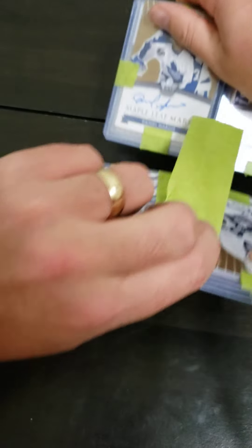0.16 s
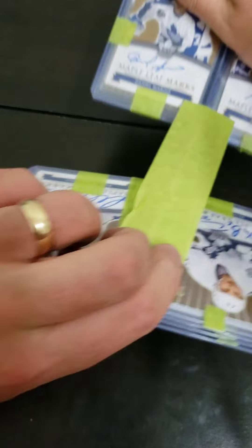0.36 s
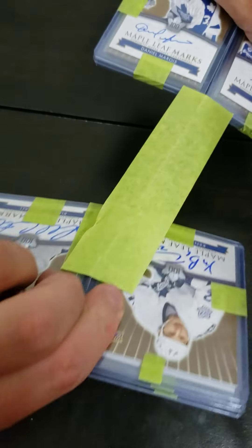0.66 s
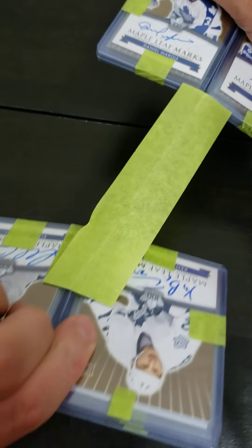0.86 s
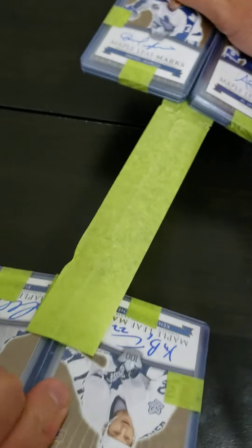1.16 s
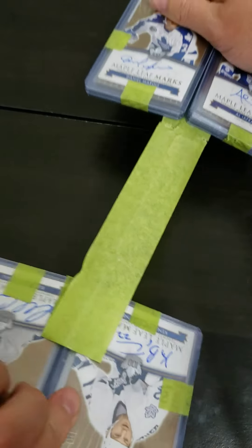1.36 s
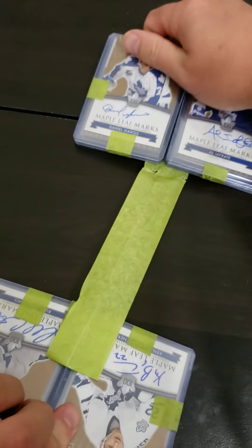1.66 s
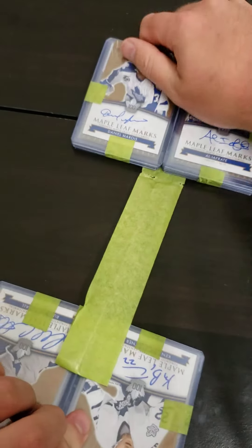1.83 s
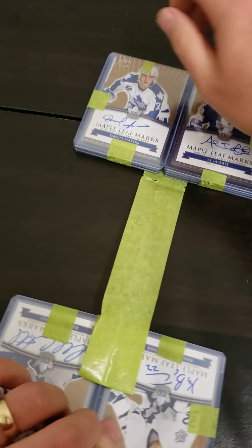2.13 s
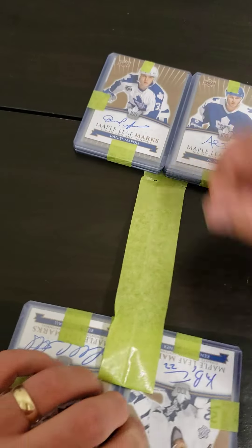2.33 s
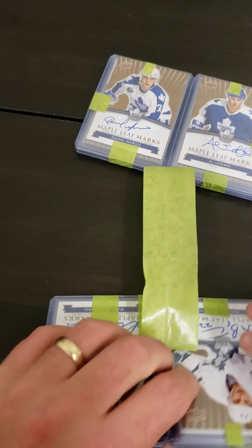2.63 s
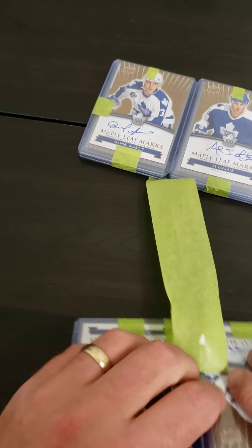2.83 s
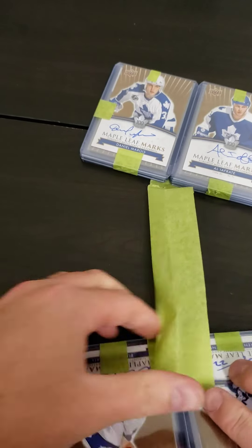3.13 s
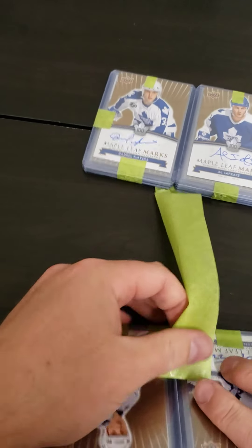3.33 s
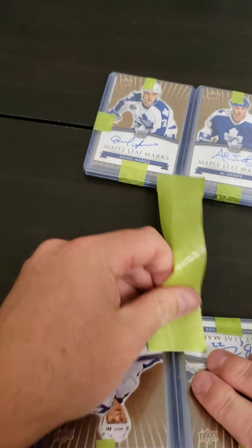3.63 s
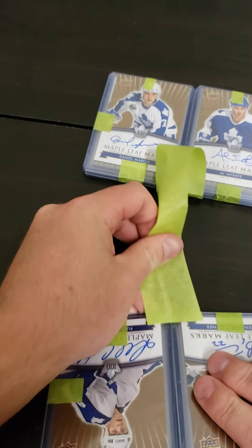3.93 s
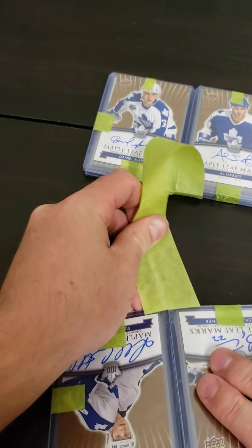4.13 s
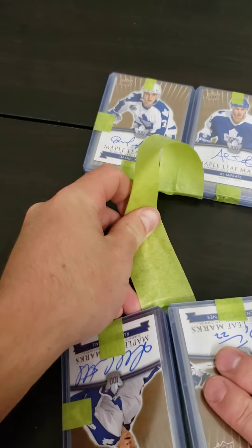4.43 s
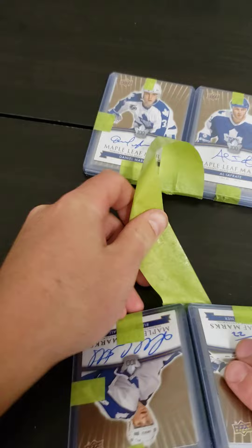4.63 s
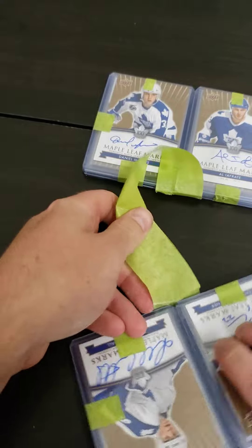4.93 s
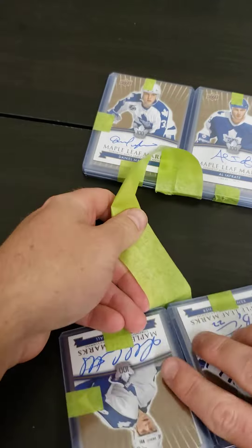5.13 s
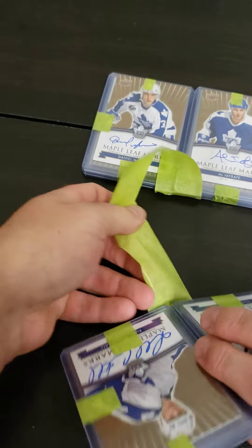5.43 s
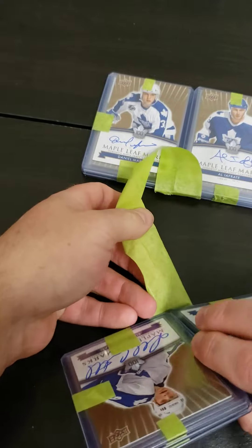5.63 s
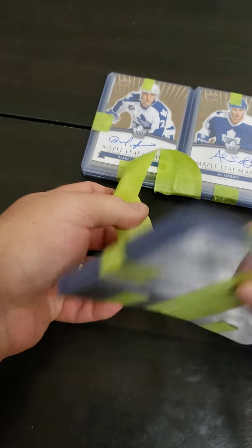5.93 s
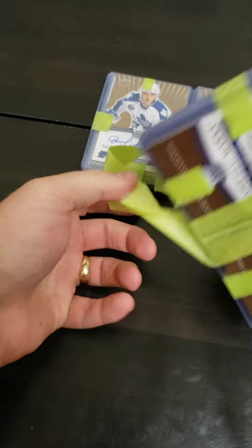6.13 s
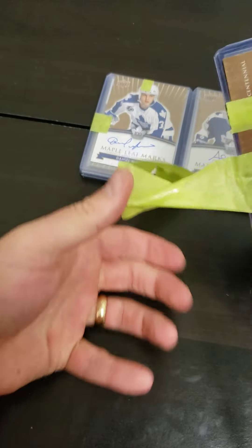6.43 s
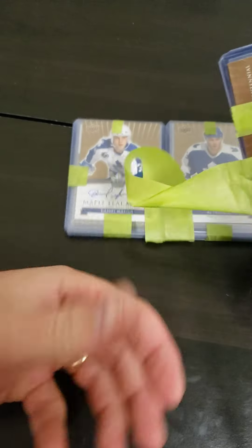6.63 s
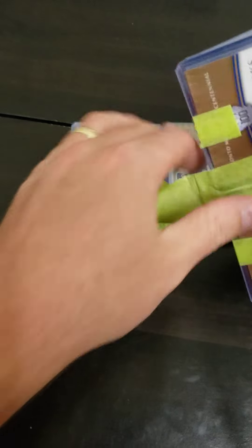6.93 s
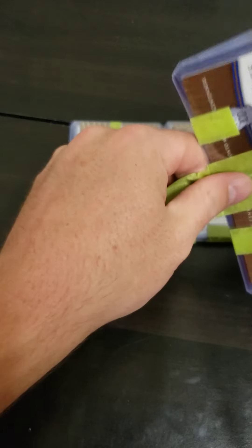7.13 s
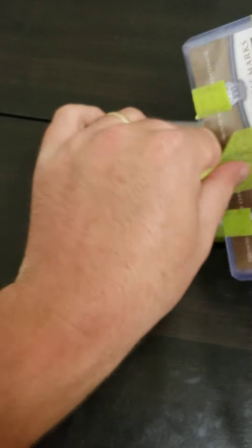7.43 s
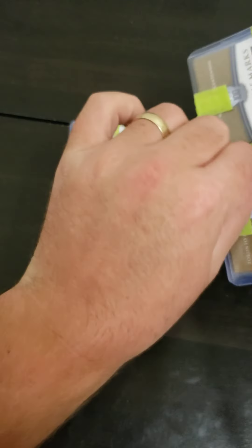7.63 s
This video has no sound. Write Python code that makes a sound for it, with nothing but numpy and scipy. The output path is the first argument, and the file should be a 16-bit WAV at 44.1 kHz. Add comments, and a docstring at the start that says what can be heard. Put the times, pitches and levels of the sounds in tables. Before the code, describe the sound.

Close stereo pickup at a table in a small, lightly echoing room, with a faint low motor hum and air noise. At 0 s masking tape rips off hard plastic in a dense, gritty crackle, strongest around 0.1-0.4 s and leaning left, with low sliding beneath. A sharp snap and knock land at 1.0 s. Quiet shuffling follows; a weak creak rises from 1.75 s into clustered stack knocks at 2.05 s. Soft slides and finger brushing lead to a second, hollow crackling peel at 3.5-4.1 s, ending in the hardest, brightest crack at 4.23 s. From 4.65 to 5.4 s the stack scrapes and judders dully, with a click at 5.26 s. After light ticks, slack tape crinkles and snaps at 6.2-6.6 s, with a knock and soft bumps. A short pull at 7.3-7.7 s brings more knocks and cracks, the last at 7.73 s.

```python
"""A table in a small room, with a phone close by: masking tape is pulled off stacks of hard plastic card holders.
Glue lets go in showers of tiny snaps through the resonant strip; cracks are bursts of fractures with a short ring.
Stacks slide (low friction noise), judder (slip pulses), knock (damped modes) and creak (a rising tone).
Fingers brush the plastic, the phone is bumped, and a low hum and faint air noise run throughout."""
import sys
import numpy as np
from scipy import signal
from scipy.fft import rfft, irfft
from scipy.io import wavfile
from scipy.ndimage import uniform_filter1d

SR = 44100
rng = np.random.default_rng(int(sys.argv[2]) if len(sys.argv) > 2 else 0)


def to_wav(s):
    """Save 16-bit WAV."""
    ch = np.atleast_2d(s).T  # columns
    pcm = np.round(np.clip(ch, -1, 1) * 32767)  # PCM
    wavfile.write(sys.argv[1], SR, pcm.astype(np.int16))


N = 342657
T = np.arange(N) / SR

# Steady pulls on the tape. Each row: start in seconds, length in seconds, level in dB,
# treble against it in dB, shape of the strip.
PULLS = [(0.0, 0.57, -38.5, -1, "flat"), (.66, 0.16, -54.5, -2, "flat"), (0.756, 0.16, -42.5, -5.5, "flat"),
         (3.442, .1, -56, 2, "folded"), (3.554, 0.58, -44.5, -3.5, "folded"),
         (6.147, 0.034, -49, 2, "slack"), (6.295, 0.24, -47, -1.5, "slack"),
         (7.259, 0.44, -42.5, -1.5, "short")]
PULL_ATTACK_S, PULL_SAG_DB_PER_S, PULL_RELEASE_S = 0.036, 5, 0.077
# Rips, where a stretch of glue gives way and the peel races. Each row: centre in seconds,
# half width in seconds, level in dB, treble against it in dB, shape of the strip.
RIPS = [(.165, 0.037, -25.5, -6, "flat"), (.295, 0.021, -34, -3.5, "flat"), (.988, 0.0083, -30, -5, "flat"),
        (3.659, 0.049, -34, 1, "folded"), (3.75, .06, -34, -2, "folded"),
        (3.865, 0.037, -39.5, 0.5, "folded"), (6.48, 0.018, -45, 7, "slack"),
        (7.46, 0.033, -40.5, 1.5, "short"), (7.635, 0.018, -36, -10, "short")]
# Creases buckling in the moving strip; level against a glue thread.
CRINKLES_PER_S, CRINKLE_DB = 50, 16
# Spectrum of the tape's snaps. Each row: frequency in Hz, gain in dB.
TAPE_COLOUR = [(150, -15.5), (500, -5), (1000, 1), (2000, -3.5), (3500, 3), (6000, -2), (7000, -7),
               (8500, -11), (10500, -10.5), (13000, -8.5), (15500, -10.5)]
# Strip resonances, which vary with free length and tension.
# Each row: frequency in Hz, width in Hz, lift in dB.
FLAT_STRIP = [(950, 290, 4.5), (3823, 210, 1.5), (4787, 1000, 7), (5600, 1200, 2.5)]
FOLDED_STRIP = [(1114, 400, 9.7), (2684, 440, 8.9), (4130, 190, 3), (4710, 680, 7.9)]
SLACK_STRIP = [(915, 340, 7.9), (1740, 290, 4.5), (3560, 300, 3.3), (4800, 1400, 4.2)]
SHORT_STRIP = [(1860, 360, 9.2), (4370, 300, 4.9), (5300, 320, 9.4)]

# Stacks shoved over the table. Each row: start in seconds, length in seconds, level before trim in dB.
SLIDES = [(0.0, 0.68, -50.5), (.1, 0.16, -50), (.49, 0.067, -50), (0.784, 0.15, -47.5),
          (1.154, 0.13, -61.5), (1.538, 0.7, -58), (1.653, 0.055, -47), (2.25, 0.61, -52.5),
          (2.683, .12, -53.5), (3.142, 0.41, -61.5), (3.619, 0.26, -51.5), (4.12, 0.26, -64),
          (4.664, 0.34, -52.5), (4.962, 0.18, -45), (5.15, 0.24, -55.5), (6.332, 0.363, -50),
          (7.317, 0.51, -54)]
SLIDE_ATTACK_S, SLIDE_SAG_DB_PER_S, SLIDE_RELEASE_S = 0.033, 10.5, 0.016
# Spectrum of sliding friction. Each row: frequency in Hz, gain in dB.
SLIDE_COLOUR = [(40, -36), (80, -11), (130, 5), (300, -5.5), (550, -7), (750, -17.5), (1300, -19),
                (4000, -65)]
# Table under friction. Each row: frequency in Hz, width in Hz, lift in dB.
TABLE_RESONANCES = [(134, 30, 6), (211, 15, 7.5), (334, 40, 9.5), (577, 7.3, 6.5)]

# Motor hum. Each row: mean frequency in Hz, mean level before panning in dB.
HUM = [(59.3, -49), (119, -68.5), (205, -82.5), (318, -81)]
# Spectrum of the air noise. Each row: frequency in Hz, gain in dB.
AIR_COLOUR = [(20, -31), (35, 1), (70, 7.5), (120, -4.5), (200, -8.5), (320, -10), (480, -23.5),
              (800, -28.5), (2000, -31), (4500, -30), (8500, -43), (12000, -37), (16000, -36)]
AIR_DB = -60

# Cracks of the tape and clicks of the holders. Each row: time in seconds, body, bite and treble levels
# before trim in dB, left minus right of bite and treble in dB, mean fracture delay in seconds.
SNAPS = [(0.061, -47, -30, -50, 11, 0.002), (0.117, -31, -28, -44, 16, 0.0015),
         (.277, -50, -21.5, -34.5, 1, 0.0013), (0.391, -29, -23.5, -28, 2, .0012),
         (0.485, -51, -37, -43, -3, 0.0029), (.962, -42, -27.5, -35, 7, .0014),
         (0.981, -44.5, -28, -31, 2.5, .002), (.987, -28.5, -24, -16.5, 7.5, 0.0017),
         (0.999, -28, -34, -44, -3, 0.0037), (1.38, -59.5, -70, -71, -4, 0.0033),
         (1.548, -69.5, -56.5, -69.5, 0, 0.0012), (1.924, -51, -39.5, -52, 3, 0.002),
         (2.037, -46, -35.5, -56, -1, 0.0034), (2.051, -21.5, -25, -33.5, 3.5, 0.0018),
         (2.893, -62.5, -61.5, -70, -5, 0.0018), (2.965, -61, -63.5, -83.5, -2.5, .0021),
         (3.353, -48, -54, -74.5, 1, 0.0012), (3.554, -45.5, -35, -35, -2, 0.0099),
         (3.626, -28, -28.5, -31, -3, 0.0022), (3.679, -25, -30, -28, 8, 0.005),
         (3.713, -29, -34, -18.5, 4, .0019), (3.76, -27.5, -33, -23, 1, 0.0017),
         (3.797, -39.5, -39.5, -38, 11, 0.0014), (3.857, -34, -30.5, -34.5, -1, 0.0016),
         (3.967, -45.5, -39, -41, -1, 0.0047), (4.07, -41, -40, -37, 1, 0.0014),
         (4.137, -42, -49, -47, -3, 0.0011), (4.22, -40, -43, -43, -1, 0.0046),
         (4.2307, -15, -17.5, -18.5, 3, 0.0017), (4.237, -25, -18.5, -33, 7, 0.002),
         (4.331, -31.5, -31.5, -36, 4, 0.0021), (4.579, -63, -58, -51, -2, 0.0024),
         (4.632, -57, -66, -73, -3, 0.0036), (4.815, -45.5, -43.5, -41.5, 2, 0.0018),
         (4.74, -48, -62, -56, -8, 0.0025), (4.98, -39, -46, -72, 0, 0.0038),
         (5.028, -43.5, -47.5, -67, 4, 0.0025), (5.045, -33.5, -45, -77, 3, 0.0025),
         (5.095, -41, -49, -68.5, 4, .0022), (5.259, -27.5, -33, -41, -6, 0.0013),
         (5.547, -67, -60.5, -61.5, 0, 0.0035), (5.686, -64, -63.5, -68.5, -1.5, 0.0043),
         (5.729, -62, -46, -56, 3, .0013), (5.795, -55, -35.5, -47, 4, 0.0016),
         (5.819, -56, -43.5, -51, 8, 0.002), (5.878, -36, -49, -52, 26, .001),
         (6.178, -65, -37.5, -43.5, -0.5, 0.0017), (6.287, -44, -49.5, -45.5, -5, 0.0048),
         (6.309, -36.5, -31.5, -30.5, 3.5, 0.0012), (6.342, -27, -24.5, -19.5, 6, 0.0014),
         (6.376, -39, -44, -49, 5, .0015), (6.423, -40, -44, -45, 2, 0.0012),
         (6.497, -40, -53, -38, -2, .002), (6.591, -35, -28.5, -38, 5, .0016),
         (6.92, -68.5, -58.5, -70, 0, 0.0029), (7.1, -48.5, -60, -55, 1, 0.0033),
         (7.288, -38, -39, -45, -8, 0.0021), (7.306, -26.5, -37.5, -46, -3, 0.0066),
         (7.311, -28, -35.5, -34, 8, 0.00093), (7.546, -40, -35.5, -52, 6, 0.0036),
         (7.605, -25.5, -31.5, -37, 0, 0.0049), (7.609, -25, -25, -32, 1, 0.0038),
         (7.7301, -23, -22, -31, 8, .0018)]
# Spectrum of a crack. Each row: frequency in Hz, gain in dB.
CLICK_COLOUR = [(200, -23), (650, -12.5), (850, -2.5), (1100, 3.5), (1500, -1), (1900, -0.5), (2450, 0),
                (2900, 1), (3250, 0), (3700, -1), (4400, 5.5), (6000, 0.5), (8000, -7), (11000, -7.5),
                (15500, -8.5)]

# Stacks knocking on the table. Each row: time in seconds, loudest 5 ms level before trim in dB,
# plastic ring against the table's thud in dB.
KNOCKS = [(.998, -26.5, -17.5), (1.004, -31.5, -19), (1.544, -62, 4.5), (1.669, -50.5, 24.5),
          (1.921, -43, -2.5), (2.042, -31, -24), (2.052, -20, 3), (2.073, -28, -4), (2.081, -25, -4.5),
          (2.713, -47.5, -5.5), (3.142, -58.5, -8.5), (4.231, -47, 4), (4.371, -45, -30),
          (6.343, -40.5, -31), (6.591, -32.5, -10.5), (7.313, -29.5, -24), (7.612, -31.5, -10)]
# Modes of a stack and of the table top. Each row: mean frequency in Hz, level in dB, t60 in seconds.
STACK_MODES = [(460, -15, 0.049), (537.2, 4.5, 0.11), (524, -9, 0.04), (867, -9.5, 0.031),
               (1150, -16.5, 0.03), (1315, -8, 0.051), (1526, -30, 0.034)]
TABLE_MODES = [(90, 3.5, 0.048), (128.2, 2.5, 0.14), (220, 4, 0.049), (275, -1.5, 0.048), (330, -7, 0.052)]
# Spectrum of the holders' rattle. Each row: frequency in Hz, gain in dB.
RATTLE_COLOUR = [(70, -6), (130, 2.5), (400, -1), (1100, -6), (2000, -14), (5000, -35.5)]

# Soft bumps of the hand holding the phone. Each row: start in seconds, length in seconds,
# frequency in Hz, level in dB.
BUMPS = [(1.578, 0.036, 63.3, -44), (3.505, 0.05, 89, -48), (6.494, 0.055, 109, -44.5),
         (6.602, 0.048, 94, -37.5), (6.624, 0.078, 51.5, -37.5), (6.863, 0.026, 63.7, -33),
         (6.974, 0.061, 70.7, -43.5)]

# Fingers brushing the holders. Each row: start in seconds, length in seconds, level before trim in dB,
# treble against it in dB.
BRUSHES = [(1.641, 0.14, -62, -12.5), (2.71, 0.048, -78.5, -22), (2.877, 0.1, -68, -11),
           (3.119, 0.5, -64.5, -0.5), (4.683, 0.26, -55, -9.5), (4.96, .13, -44, -26),
           (5.118, 0.25, -54, -9.5), (5.793, 0.082, -51, -7.5), (6.021, .13, -64.5, 12.5),
           (7.003, 0.12, -58, 0.5), (7.191, 0.092, -57.5, -2)]
BRUSH_ATTACK_S, BRUSH_SAG_DB_PER_S, BRUSH_RELEASE_S = 0.041, 16.5, 0.043
# Holder resonances. Each row: frequency in Hz, width in Hz, lift in dB.
HOLDER_RESONANCES = [(1730, 420, 9.5), (2450, 510, 6.5), (3260, 170, -5), (4430, 1100, 5.5)]

# Pitch path of a pressed stack's creak. Each row: time in seconds, mean frequency in Hz, mean level in dB.
CREAK_PATH = [(1.74, 377, -83), (1.831, 407, -70.5), (1.909, 461, -60.5), (1.96, 490, -65.5),
              (2.03, 534, -64)]

# A turned stack sticking and slipping. Each row: start in seconds, length in seconds,
# mean slips per second, loudest 20 ms level in dB.
JUDDERS = [(4.68, 0.11, 97, -44), (4.78, 0.072, 122, -49), (4.982, 0.046, 99, -41.5),
           (5.045, 0.068, 140, -44)]
# Spectrum of slips drumming on the table. Each row: frequency in Hz, gain in dB.
DRUMMING_COLOUR = [(40, -26), (95, -5.5), (140, 13.5), (190, -7), (320, -15), (700, -9.5), (2000, -39.5)]

# Room resonances. Each row: frequency in Hz, width in Hz, lift in dB.
ROOM_MODES = [(214, 14, 3.5), (324, 11, 6.5)]
# The two microphone ports. Each row: frequency in Hz, gain in dB.
LEFT_PORT = [(100, -3.5), (300, -2), (1000, -1), (4000, -2.5), (6500, -3.5), (9000, -12.5), (15000, -5)]
RIGHT_PORT = [(100, -2.5), (300, 4), (1000, -0.5), (4000, -2.5), (6500, -1.5), (9000, -0.5), (15000, 8.5)]
LOW_CUT_HZ, TOP_HZ = 40, 15900
TREBLE_SPLIT_HZ = 7800


def undb(db):
    """Decibels to gain."""
    return 10 ** (np.asarray(db) / 20)


def unit(x):
    """Scale to rms 1."""
    return x / np.sqrt(np.mean(x ** 2) + 1e-18)


def crest(x, size):
    """Scale so that the loudest stretch of `size` samples has rms 1."""
    power = np.mean(np.atleast_2d(x) ** 2, axis=0)
    loudest = uniform_filter1d(power, size, mode="constant").max()
    return x / np.sqrt(loudest + 1e-18)


def add(out, start_s, x):
    """Mix a sound in at a time."""
    i = max(int(start_s * SR), 0)
    out[..., i:i + x.shape[-1]] += x[..., :max(N - i, 0)]


def colour(x, points):
    """Causal minimum-phase filter through (Hz, dB) points."""
    hz, db = np.transpose(points)
    size = 4096
    bins_hz = np.arange(size // 2 + 1) * SR / size
    gain = undb(np.interp(np.log(bins_hz + 1), np.log(hz), db))
    # fold the cepstrum so that the response starts at once
    cepstrum = irfft(np.log(gain))
    cepstrum[1:size // 2] *= 2
    cepstrum[size // 2 + 1:] = 0
    response = irfft(np.exp(rfft(cepstrum)))
    return signal.fftconvolve(np.atleast_2d(x), response[None], axes=1)[:, :x.shape[-1]]


def split(x, hz):
    """The parts below and above a frequency."""
    low, high = [signal.butter(4, hz, kind, fs=SR, output="sos") for kind in ("low", "high")]
    return [signal.sosfilt(sos, x + 1e-18) for sos in (low, high)]


def resonate(x, peaks):
    """Lift or dip the sound around each (Hz, width Hz, dB) resonance."""
    changed = 0
    for hz, width_hz, db in peaks:
        b, a = signal.iirpeak(hz, hz / width_hz, fs=SR)
        changed = changed + (undb(db) - 1) * signal.lfilter(b, a, x)
    return x + changed


def walk(rate_hz):
    """Slow random signal of spread near 1, gliding to a new value at the given rate."""
    k = max(int(SR / rate_hz), 1)
    steps = np.repeat(rng.standard_normal(N // k + 1), k)
    return uniform_filter1d(steps, k)[:N] * np.sqrt(3 / 2)


def sides(pan_db):
    """Left and right gains for a left minus right difference."""
    return undb(np.array([[.5], [-.5]]) * pan_db)


def ticks(at, sizes, count, lead_s=.00006, spread_s=.00013):
    """Impulses from scattered spots, each with its own lag between the ports."""
    lag = (lead_s + spread_s * rng.standard_normal(len(at))) * SR
    ports = []
    for i in (at, at + lag):
        index = np.clip(i, 0, count - 1).astype(int)
        ports.append(np.bincount(index, sizes, count))
    return np.array(ports)


def shower(rate_hz, scatter_db):
    """A steady random stream of tiny snaps, a few of them much larger than the rest."""
    at = np.flatnonzero(rng.random(N) < rate_hz / SR)
    scatter = np.clip(rng.standard_normal(N), -3, 2.5)
    sizes = undb(scatter_db * scatter) * rng.choice([-1, 1], N)
    return ticks(at, sizes[at], N)


def stroke(start_s, length_s, db, attack_s, sag_db_per_s, release_s):
    """Gain of one move of the hand: it takes hold, eases off slowly and lets go."""
    gain, age = np.zeros(N), T[:SR + SR // 4]
    attack = np.minimum(age / attack_s, 1)
    release = np.exp(-np.maximum(age - length_s, 0) / release_s)
    add(gain, start_s, undb(db - sag_db_per_s * age) * attack * release)
    return gain


def crackle(moves, grains, peaks, pan_db):
    """Play snaps through a resonant sheet, as hard and as bright as each (gain, treble dB) move asks."""
    body_gain = np.sqrt(sum(gain ** 2 for gain, _ in moves))
    treble_gain = np.sqrt(sum((gain * undb(treble_db)) ** 2 for gain, treble_db in moves))
    body, treble = split(resonate(grains, peaks), TREBLE_SPLIT_HZ)
    return sides(pan_db) * (body_gain * unit(body) + treble_gain * unit(treble))


def pulling(shape):
    """Moves made while the strip has this shape: steady pulls, and rips that swell and fade evenly."""
    moves = []
    for start_s, length_s, db, treble_db, strip in PULLS:
        if strip == shape:
            gain = stroke(start_s, length_s, db, PULL_ATTACK_S, PULL_SAG_DB_PER_S, PULL_RELEASE_S)
            moves.append((gain, treble_db))
    for centre_s, half_width_s, db, treble_db, strip in RIPS:
        if strip == shape:
            distance = np.minimum(abs(T - centre_s) / half_width_s, 20)
            moves.append((undb(db) / np.cosh(distance), treble_db))
    return moves


def bounce(x, lag_s=0.0004996, sway=.2):
    """The table reflects the strip; the colour shifts as the hand moves it."""
    late = T - lag_s * np.exp(sway * walk(9))
    return x + np.array([np.interp(late, T, side) for side in x]) / 2


def peeling():
    """Glue threads break by thousands and creases buckle; the peel line sticks and jumps every few ms."""
    slips = undb(3 * walk(420) + 1.3 * walk(70))
    threads = shower(rate_hz=6000, scatter_db=5)
    creases = undb(CRINKLE_DB) * shower(rate_hz=CRINKLES_PER_S, scatter_db=0.5)
    grains = bounce(colour(threads * slips + creases, TAPE_COLOUR))
    return (crackle(pulling("flat"), grains, FLAT_STRIP, pan_db=5.5)
            + crackle(pulling("folded"), grains, FOLDED_STRIP, pan_db=0.0)
            + crackle(pulling("slack"), grains, SLACK_STRIP, pan_db=1.0)
            + crackle(pulling("short"), grains, SHORT_STRIP, pan_db=3.5))


def sliding(trim_db=-3):
    """Friction under the stacks stirs the low resonances of the table."""
    power = 0
    for start_s, length_s, db in SLIDES:
        power = power + stroke(start_s, length_s, db, SLIDE_ATTACK_S, SLIDE_SAG_DB_PER_S, SLIDE_RELEASE_S) ** 2
    friction = shower(rate_hz=2000, scatter_db=3) * undb(2 * walk(45))
    table = resonate(colour(friction, SLIDE_COLOUR), TABLE_RESONANCES)
    return undb(trim_db) * np.sqrt(power) * unit(table)


def background(side_db=-5, hum_pan_db=-2):
    """A motor hums somewhere in the house, slightly unsteady, over faint air noise."""
    hum = 0
    for hz, db in HUM:
        tone = np.sqrt(2) * np.sin(2 * np.pi * hz * (T + .0002 * walk(3)))
        hum = hum + undb(db + .4 * walk(5)) * tone
    noise = rng.standard_normal(N) + undb(side_db) * rng.standard_normal((2, N))
    return sides(hum_pan_db) * hum + undb(AIR_DB) * unit(colour(noise, AIR_COLOUR))


def snaps(ring_s=0.0082, ring_db=-13, ring_side_db=-3, trim_db=-3.0):
    """Each crack is a quick run of fractures with the short, noisy ring of the holders."""
    out, count = np.zeros((2, N)), 2048
    fade = np.exp(-T[:count] / ring_s)
    for s, body_db, bite_db, treble_db, pan_db, delay_s in SNAPS:
        delays_s = delay_s * rng.gamma(2, size=40) / 2
        run = ticks(delays_s * SR + 10, rng.laplace(size=40), count)
        noise = rng.standard_normal(count) + undb(ring_side_db) * rng.standard_normal((2, count))
        sound = colour(crest(run, size=88) + undb(ring_db) * noise * fade, CLICK_COLOUR)
        below, treble = split(sound, TREBLE_SPLIT_HZ)
        body, bite = split(below, 3000)
        bright = undb(bite_db) * crest(bite, size=265) + undb(treble_db) * crest(treble, size=265)
        add(out, s, undb(body_db) * crest(body, size=265) + sides(pan_db) * bright)
    return undb(trim_db) * out


def ringing(modes, detune=0.029):
    """Damped modes after one blow, a little different at every spot."""
    t, total = T[:SR // 3], 0
    for hz, db, t60_s in modes:
        spot_hz = hz * (1 + detune * rng.standard_normal())
        total = total + undb(db) * np.sin(2 * np.pi * spot_hz * t) * undb(-60 * t / t60_s)
    return crest(total, size=220)


def knocks(rattle_db=-5, rattle_s=0.014, trim_db=-1):
    """A stack drops on the table: the top thuds, the stack rings and its holders rattle together."""
    out, t = np.zeros((2, N)), T[:SR // 3]
    for s, db, ring_db in KNOCKS:
        rattle = colour(rng.standard_normal(len(t)) * np.exp(-t / rattle_s), RATTLE_COLOUR)
        thud = ringing(TABLE_MODES)
        ring = undb(ring_db) * ringing(STACK_MODES, detune=0.015)
        blow = thud + ring + undb(rattle_db) * crest(rattle, size=220)
        add(out, s, undb(db + trim_db) * crest(blow, size=220))
    return out


def bumps():
    """A few slow swings of the phone's case."""
    out = np.zeros((2, N))
    for s, length_s, hz, db in BUMPS:
        t = T[:int(length_s * SR)]
        swell = np.sin(np.pi * t / length_s)
        add(out, s, undb(db) * np.sqrt(2) * swell * np.sin(2 * np.pi * hz * t))
    return out


def brushing(catch_db=4, trim_db=-1):
    """Skin rubs the plastic with a soft, uneven grain."""
    catches = undb(catch_db * walk(160))
    grains = colour(shower(rate_hz=4400, scatter_db=2.0) * catches, TAPE_COLOUR)
    moves = []
    for start_s, length_s, db, treble_db in BRUSHES:
        gain = stroke(start_s, length_s, db, BRUSH_ATTACK_S, BRUSH_SAG_DB_PER_S, BRUSH_RELEASE_S)
        moves.append((gain, treble_db))
    return undb(trim_db) * crackle(moves, grains, HOLDER_RESONANCES, pan_db=0.5)


def creak(wobble=0.0397, rough_db=4):
    """Plastic creeping on the table sings a weak, unsteady, rising tone before it drops."""
    s, hz, db = np.transpose(CREAK_PATH)
    pitch_hz = np.interp(T, s, hz) * (1 + wobble * walk(90))
    phase = 2 * np.pi * np.cumsum(pitch_hz) / SR
    gain = np.interp(T, s, undb(db), left=0, right=0)
    return gain * undb(rough_db * walk(100)) * np.sin(phase)


def judders(jitter=0.3):
    """Uneven slips drum on the table and die away."""
    out = np.zeros((2, N))
    for s, length_s, slips_per_s, db in JUDDERS:
        at_s = np.cumsum(1 + jitter * rng.standard_normal(size=24)) / slips_per_s
        at_s = at_s - at_s[0]
        sizes = np.clip(1 - (at_s / length_s) ** 2, 0, 1)
        pulses = ticks(at_s * SR, sizes, count=16384)
        add(out, s, undb(db) * crest(colour(pulses, DRUMMING_COLOUR), size=880))
    return out


def room(x, low_t60_s=0.5, mid_t60_s=0.46, high_t60_s=0.5, low_db=-9, mid_db=-10, high_db=-14, onset_s=0.0082):
    """Diffuse echoes of a small room fade in three bands; long waves reach both ports alike."""
    t = T[:SR * 3 // 4]
    common, apart = rng.standard_normal((2, len(t)))
    apart = signal.lfilter(*signal.butter(1, 450, "high", fs=SR), apart)
    body, high = split(np.array([common + apart, common - apart]) / np.sqrt(2), 6400)
    low, mid = split(body, 700)
    bands = ((low, low_t60_s, low_db), (mid, mid_t60_s, mid_db), (high, high_t60_s, high_db))
    tail = 0
    for noise, t60_s, db in bands:
        fade = undb(-60 * t / t60_s) * (1 - np.exp(-(t / onset_s) ** 2))
        tail = tail + undb(db) * noise * fade / np.sqrt(np.sum(fade ** 2))
    return signal.fftconvolve(x, resonate(tail, ROOM_MODES), axes=1)[:, :N]


def scene():
    """Everything on the table sounds into the room; each port colours it in its own way."""
    near = peeling() + sliding() + snaps() + knocks() + brushing() + creak() + judders()
    left, right = near + room(near)
    ports = np.vstack([colour(left, LEFT_PORT), colour(right, RIGHT_PORT)])
    return ports + bumps() + background()


def record(dry):
    """The phone cuts the deepest bass and the top."""
    low_cut = signal.butter(4, LOW_CUT_HZ, "high", fs=SR, output="sos")
    top_cut = signal.ellip(10, .2, 70, TOP_HZ, fs=SR, output="sos")
    return signal.sosfilt(top_cut, signal.sosfilt(low_cut, dry))


dry = scene()
out = record(dry)
to_wav(out)
```